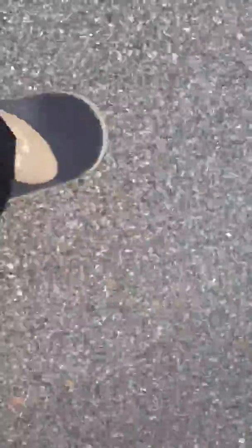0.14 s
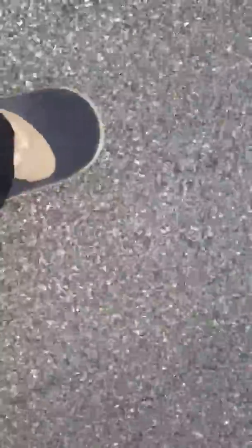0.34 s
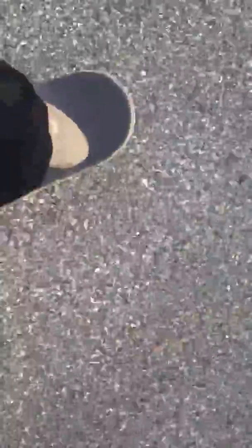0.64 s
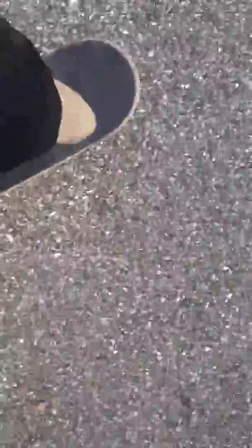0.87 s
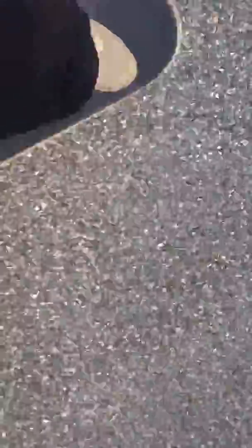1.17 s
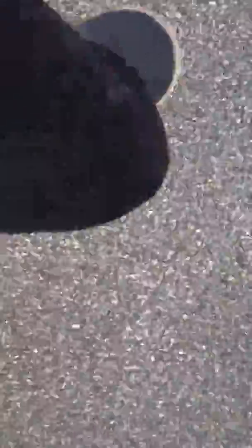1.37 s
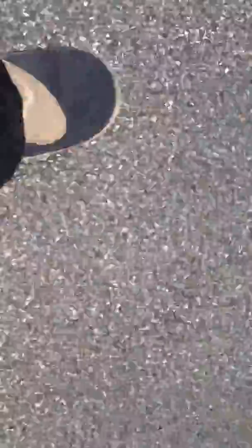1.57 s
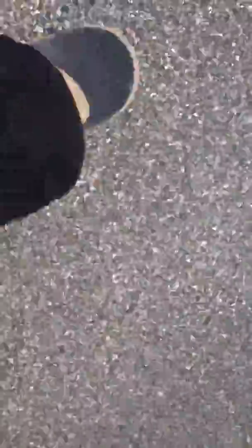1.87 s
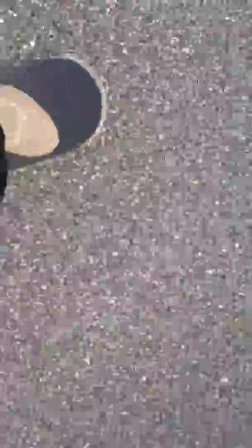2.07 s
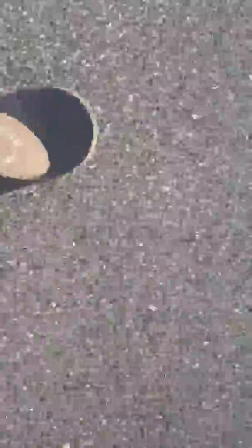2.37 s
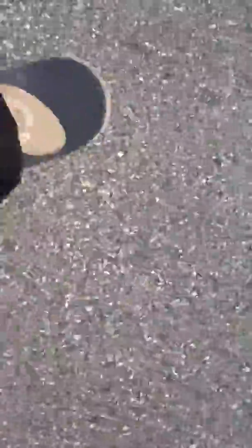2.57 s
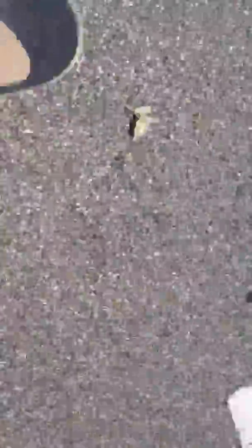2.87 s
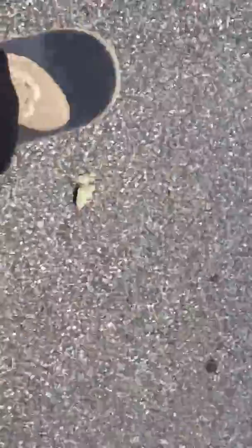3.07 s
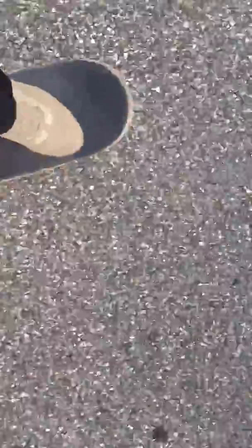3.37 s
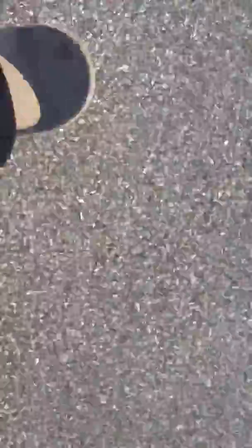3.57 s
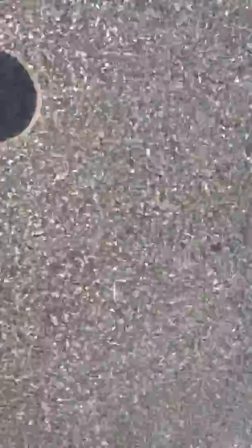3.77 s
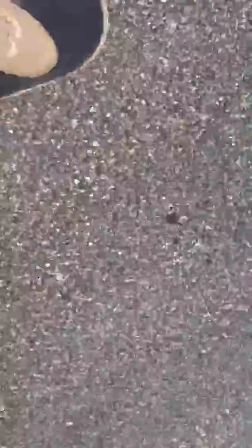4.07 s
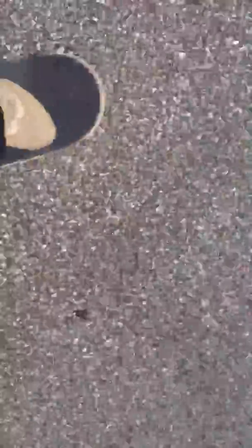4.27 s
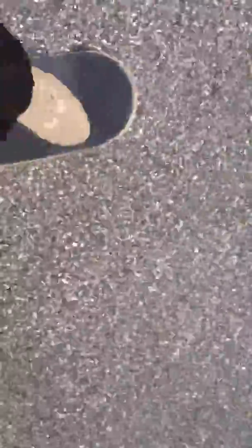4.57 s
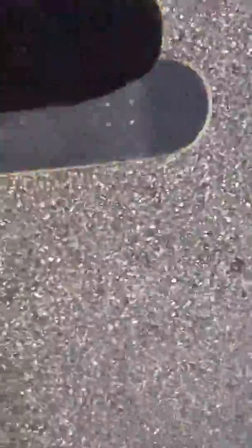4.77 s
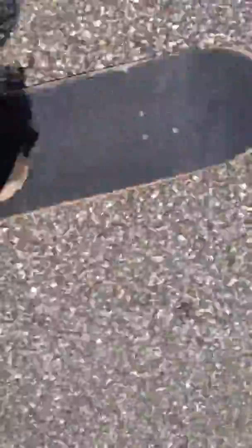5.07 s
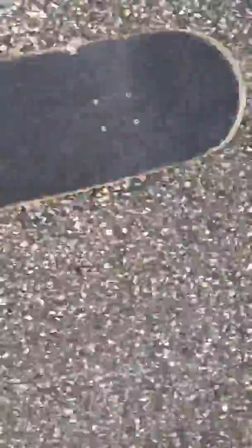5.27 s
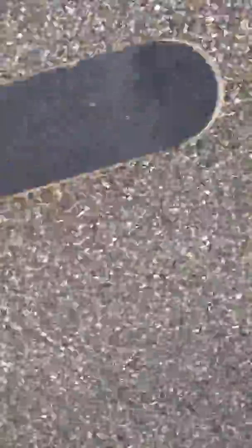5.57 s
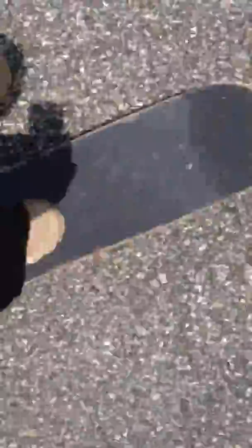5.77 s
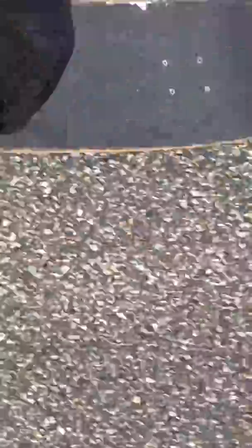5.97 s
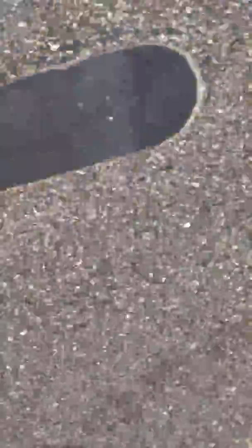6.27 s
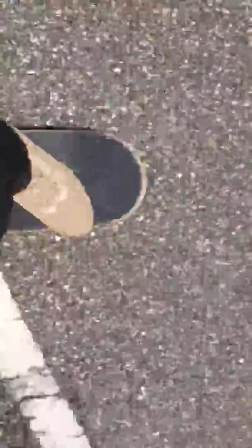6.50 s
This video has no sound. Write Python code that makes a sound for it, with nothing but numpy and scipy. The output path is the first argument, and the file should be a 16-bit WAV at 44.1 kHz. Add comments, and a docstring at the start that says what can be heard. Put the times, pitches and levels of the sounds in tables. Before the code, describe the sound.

From 0 s a skateboard rolls steadily over coarse asphalt, close and mono: a low, woody, uneven rumble with dry crunch, faint sandy fizz and tiny pebble ticks. Around 1.3 s the nose lifts; the rumble thins to a rear-wheel rasp, and at 1.6 s the front wheels knock down hard with quick rebounds and a short scrub. A shorter lift lands at 2.0 s, with sharp grit snaps. Rolling sags near 2.7 s; another lift from 2.9 ends in a double clack at 3.2. A fourth, from 3.55, thuds at 3.8, followed by scrubs and a small knock at 4.0. It is quieter around 4.4, with brief scrubs to 4.7. From 5.0 jolts build, bursting loudly at 5.3, easing, then clattering hardest at 5.9-6.1. Strong gritty rumble continues with more jolts and a hoarse, juddering scrub from 6.5 to the end, 6.6 s. Open air is only a faint wash.

```python
"""Coarse asphalt outdoors, heard from just above the deck of a rolling skateboard.
Random stone impacts drive deck resonances; four nose lifts add rear-wheel rasp and front-wheel knocks.
Filtered sparse grains make sand, grit and pebbles; decaying modes and short shocks make knocks and jolts.
Sideways wheel scrubs come throughout; late on, loud jolts over rougher ground. Behind, a faint noise wash of air."""
import sys
import numpy as np
from scipy import signal
from scipy.io import wavfile
from scipy.ndimage import uniform_filter1d, minimum_filter1d, map_coordinates

SR = 44100
rng = np.random.default_rng(int(sys.argv[2]) if len(sys.argv) > 2 else 0)


def to_wav(sig):
    """Store sig (one row per channel, or 1-D mono) as 16-bit WAV at the path in sys.argv[1].

    Samples outside -1..1 are clipped; the rate is SR.
    """
    pcm = np.clip(np.atleast_2d(sig), -1, 1) * 32767
    pcm = np.round(pcm).astype(np.int16)
    wavfile.write(sys.argv[1], SR, pcm.T)  # frames by channels


N = 292813
TIME = np.arange(N) / SR
HZ = np.fft.rfftfreq(4096, 1 / SR) + 1  # offset keeps log(0) away
EDGE_HZ = 15450

# Fine sand under the wheels: t/s, nominal level/dB, tilt to the finest fizz/dB
SAND_FIZZ = [(0, -58.5, 3), (0.9, -63, 0.5), (1.08, -68.5, -0.5), (1.33, -55, -1), (1.9, -58, 1),
             (2.12, -51.5, 2), (2.6, -62, 4), (3.0, -53, 0), (3.2, -60, 0), (3.48, -52.5, -1),
             (4.05, -60.5, 0.5), (4.3, -59, 3), (4.95, -55, 0.5), (5.32, -39.5, 2), (5.6, -54, 0),
             (6.02, -32.5, 2), (6.2, -48, -1.5), (6.48, -43.5, 2), (6.64, -53.5, 2.5)]
# Hiss spectrum of fine sand: f/Hz, level/dB
SAND_HISS = [(2500, -12), (3800, 1.5), (4900, 3.5), (6300, 4.5), (8000, 6.5), (9800, 4.5), (11000, 2),
             (12300, 2), (14500, -3), (16000, 9)]
# Grit bursting under a wheel: t/s, nominal level/dB, length/s, brightest f/Hz
GRIT_BURSTS = [(0.635, -55, 0.014, 5700), (0.86, -61.5, 0.12, 11800), (1.332, -46.5, 0.02, 14500),
               (1.39, -40, 0.017, 15400), (1.447, -52, 0.0074, 6670), (1.701, -52, 0.041, 12800),
               (1.952, -36.5, 0.02, 13000), (1.9625, -27.5, 0.003, 12400), (1.968, -38, 0.034, 13800),
               (2.066, -47, 0.013, 10400), (2.272, -50, 0.015, 10200), (2.19, -67, 0.58, 10700),
               (2.914, -34.5, 0.021, 14500), (2.977, -43, 0.021, 7560), (2.998, -49, .014, 7500),
               (3.059, -52, 0.0066, 14000), (3.595, -50, 0.042, 12600), (3.908, -48.5, 0.0064, 5650),
               (4.118, -50, 0.018, 11800), (4.292, -50.5, 0.033, 12200), (4.406, -47, 0.009, 14200),
               (4.59, -52, 0.29, 13700), (4.716, -44.5, 0.023, 7150), (4.785, -45.5, 0.016, 8240),
               (4.809, -55, .02, 10000), (5.171, -38.5, 0.01, 13900), (5.716, -40, 0.034, 9900)]
# Small steel wheel parts rung by grit: f/Hz, width/Hz, nominal level/dB
STEEL_MODES = [(3500, 240, 4.5), (5140, 400, 4.5), (5860, 230, 6), (7320, 340, 7.5), (9120, 220, 4.5),
               (10350, 420, 4), (12120, 350, -0.5), (12400, 480, -12.5), (14500, 940, -0.5)]
# Pebbles ticking against a wheel: t/s, peak level/dB, ring f/Hz
PEBBLE_TICKS = [(0.1282, -30, 1520), (0.3465, -27, 1500), (0.6856, -25, 1400), (0.7688, -26.5, 1330),
                (0.9152, -23, 1340), (0.9257, -22, 1530), (0.9454, -22.5, 1710), (1.2368, -20.5, 1190),
                (1.293, -21, 1400), (1.8752, -27.5, 1410), (1.9133, -26.5, 1500), (1.991, -25.5, 1460),
                (2.647, -34.5, 1430), (2.2765, -27, 1680), (2.8749, -19.5, 1480), (3.3628, -24.5, 1380),
                (3.3946, -25.5, 1420), (3.508, -23, 1480), (4.511, -26.5, 1330), (4.5497, -24, 1772),
                (4.6853, -23.5, 1580), (4.8893, -27, 1300), (4.9317, -25, 1300), (5.2435, -16, 1300),
                (5.434, -18.5, 1400), (5.4757, -21.5, 1980), (5.811, -17, 1360), (5.895, -11, 1300),
                (5.933, -0.5, 1320), (6.0373, -7, 1900), (6.2109, -19, 1330), (6.222, -18, 2100),
                (6.276, -15, 2160), (6.3113, -16.5, 2340), (6.4997, -8, 1870)]
# Deep thumps of the hardest blows: t/s, level/dB, length/s
BLOW_THUMPS = [(1.608, -49, 0.014), (3.837, -65, 0.0055), (5.268, -57, 0.018), (6.004, -37, 0.014),
               (6.035, -40, 0.029), (6.444, -50, .04)]
# Wheels striking large stones: t/s, thud level/dB, crack level/dB
STONE_JOLTS = [(1.280, -36, -39.5), (1.873, -38, -42), (2.42, -40, -47), (4.892, -46.5, -46.5),
               (5.027, -36.5, -43), (5.062, -36, -38.5), (5.133, -30, -35), (5.275, -24, -45),
               (5.286, -13.5, -26), (5.319, -18, -32), (5.416, -26.5, -35), (5.671, -30.5, -41.5),
               (5.703, -35, -56), (5.876, -26, -38), (5.933, -15.5, -27), (5.954, -19.5, -43),
               (5.963, -25, -31), (6.013, -8, -47), (6.041, -13, -26), (6.062, -19.5, -31.5),
               (6.075, -13, -22), (6.156, -29, -34.5), (6.193, -23, -44), (6.227, -29, -33),
               (6.336, -27, -53), (6.462, -17, -32), (6.473, -22.5, -31)]
# Wheels scrubbing sideways: t/s, ring level/dB, length/s, judder re ring/dB, ring f/Hz, start pitch/ring pitch
WHEEL_SCRUBS = [(1.258, -43.5, 0.048, -15, 2650, 0.84), (1.664, -31.5, 0.061, -17, 1250, 1.23),
                (3.359, -47.5, 0.07, -1, 1440, 1.3), (3.902, -43.5, 0.13, -4, 1320, 1.04),
                (3.926, -55, 0.092, -18, 3920, .95), (4.0092, -33, 0.0041, -16, 4160, 0.95),
                (4.475, -38.5, 0.088, -27, 1400, .9), (4.664, -37, 0.075, -7.5, 1510, 1.05),
                (6.473, -22, 0.065, -7.5, 1940, 0.72), (6.553, -28, 0.2, -0.5, 1760, 0.93)]
# Wheels knocking down: t/s, thud level/dB, clack level/dB, first rebound gap/s, bass from rider's weight/dB
WHEEL_KNOCKS = [(1.5875, -16.5, -32, 0.004, -5), (2.0044, -31, -30, .0061, -7),
                (3.2, -33.5, -31, 0.0062, -23), (3.2358, -34, -35, 0.0019, -6.5),
                (3.802, -25, -35, .0062, -1.5), (4.010, -35.5, -42, 0.0014, 11.5)]
# Deck ringing freely at a landing: f/Hz, level/dB, t60/s
LANDING_MODES = [(159, -17, 0.099), (290, -1.5, 0.059), (520, 7, 0.036), (565, 7, 0.039), (681, -2.5, 0.06),
                 (1120, -2, 0.036), (1360, -11, 0.054), (1520, -8, .036), (1676, -16.5, 0.037),
                 (2040, -32, 0.036)]
# Nose lifts, board pivots on rear wheels: lift t/s, landing t/s, roll-on t/s, fade by landing/dB, rasp level/dB
NOSE_LIFTS = [(1.304, 1.582, 1.74, -9, -42), (1.886, 2.014, 2.035, -7.5, -42.5),
              (2.896, 3.221, 3.31, -7.5, -41.5), (3.563, 3.814, 4.3, -13.5, -41.5)]
# Rear truck: f/Hz, width/Hz, level/dB
TRUCK_MODES = [(1480, 760, 3), (2595, 700, -3.5)]
# Deck and trucks: f/Hz, width/Hz, level/dB
DECK_MODES = [(190.6, 38, -19), (275, 157, -5.5), (336, 27.6, -5.5), (510.2, 68.5, 1), (590, 58, 4.5),
              (689.3, 107, 9), (1099, 287, -3.5), (1213, 21, -1.5), (1304, 82, -7), (1432, 405, -9.5),
              (1805, 245, -17.5), (2050, 270, -24), (2325, 34, -21.5), (2564, 1000, -28.5),
              (3320, 1150, -37.5), (4860, 810, -30)]
# Road drumming on the wheels, from speed and coarseness: t/s, base drive level/dB
ROAD_DRIVE = [(0, -39.5), (0.75, -38), (1.12, -42), (1.7, -34.5), (2.1, -39), (2.42, -37.5), (2.68, -50.5),
              (2.95, -38), (3.5, -40.5), (3.99, -41.5), (4.25, -44.5), (4.5, -46), (4.86, -40),
              (5.33, -19.5), (5.57, -32), (5.7, -31), (5.98, -17), (6.35, -24.5), (6.64, -23.5)]
# Sharpness of the stones: t/s, base crunch re drive/dB
STONE_CRUNCH = [(0, -15), (0.55, -16), (0.7, -10), (0.95, -11.5), (1.12, -12), (2.2, -12.5), (2.75, -11.5),
                (4.1, -14), (4.7, -7.5), (4.9, -8.5), (5.3, -9.5), (5.55, -14.5), (5.72, -8.5),
                (5.85, -9.5), (6.05, -9), (6.18, -16), (6.48, -12.5), (6.56, -13)]
# Weight on the wheels: t/s, base bass re drive/dB
WHEEL_WEIGHT = [(0, -1), (1.1, -1.5), (1.78, -1.5), (2.0, -2.5), (2.6, -3.5), (3.5, -2), (3.95, -10),
                (4.12, 0), (4.62, -0.5), (5.0, -10), (6.0, -8), (6.35, -9.5), (6.6, -5.5)]
# Rider leans on the board or eases off: t/s, extra drive/dB, half length/s
RIDER_PRESSES = [(1.244, 9, 0.078), (1.778, 1.5, 0.047), (2.79, 13, 0.11), (3.526, 4, 0.13),
                 (3.995, 11.5, 0.21), (4.359, -18, 0.041), (4.568, 7, 0.059), (4.777, 11, 0.02),
                 (4.833, -7, 0.14), (5.651, -11, 0.013), (6.47, 7, 0.038)]

PRESS_BASS_DB_PER_DB, PRESS_CRUNCH_DB_PER_DB = 0.14, -0.32  # only when leaning on
RATTLE_DB_PER_DB, CRUISE_DB = 0.0189, -46  # middle modes' gain over the body, per dB of drive over cruise
PATCH_DB, RATTLE_PATCH_DB = 0.86, 2  # asphalt patches vary drive and middle-mode rattle
SHIFT_S, UNLOAD_DB, SETTLE_DB = 0.0035, -3.5, -8.5  # weight shift; first drive drop; drive until roll-on
CRUNCH_KEPT = 0.71  # share of the lift fade that crunch escapes
STALL_S, STALL_DB = 0.056, -13.5  # rear wheels almost stop before landing; dB is for the deepest lift
RASP_LEAD_S, RASP_RISE_S, RASP_FADE_DB = 0.052, 0.01, -6.5  # catches before the lift, weakens as the turn slows
REBOUND_KEPT, REBOUND_SOONER = .55, .68  # force and gap ratio, each rebound to the one before
RATTLE_DB = -1.5  # loose truck rattle re clack
JOLT_CHATTER_S, PEBBLE_S = 0.0051, 0.0091  # wheel chatter after a stone; pebble slipping out
CRUMBLE_DB, FLUTTER_DB = -2.5, -2  # grit: toneless share, unevenness
ECHO_S, ECHO_SWAY_S, ECHO_DB = 0.002348, 0.00038, -11.5  # asphalt reflection: delay, rms sway, level


def amp(db):
    """Decibels to gain."""
    return 10 ** (np.asarray(db) / 20)


def unit(x):
    """Scales to rms 1."""
    return x / np.sqrt(np.mean(x ** 2) + 1e-20)


def steady(x, size=3500):
    """Rms near 1 over every short stretch, keeping the fast grain."""
    power = uniform_filter1d(uniform_filter1d(x ** 2, size), size // 2)
    return x / np.sqrt(abs(power) + 1e-20)


def curve(rows):
    """Every value column of a table, joined by straight lines in time."""
    s, *columns = np.transpose(rows)
    return [np.interp(TIME, s, c) for c in columns]


def shape(points):
    """Gain of a (Hz, dB) spectrum, interpolated over log frequency."""
    hz, db = np.transpose(points)
    return amp(np.interp(np.log(HZ), np.log(hz), db))


def modes(rows):
    """Gain of steep-sided resonances, summed in power."""
    return np.sqrt(sum((amp(db) / (1 + (2 * (HZ - hz) / width) ** 2)) ** 2 for hz, width, db in rows))


def below(hz, order):
    """Gain of a low-pass."""
    return 1 / np.sqrt(1 + (HZ / hz) ** (2 * order))


def above(hz, order):
    """Gain of a high-pass."""
    return 1 / np.sqrt(1 + (hz / HZ) ** (2 * order))


def ring(x, gain):
    """Causal minimum-phase filter, peak gain 1: rings only after each blow."""
    log_gain = np.log(np.maximum(gain / gain.max(), 1e-5))
    circle = np.concatenate([log_gain, log_gain[-2:0:-1]])
    taps = np.fft.ifft(np.exp(np.conj(signal.hilbert(circle)))).real[:len(HZ)]
    return signal.oaconvolve(x, taps)[:len(x)]


def add(mix, s, sound):
    """Mixes a sound in at time s."""
    part = mix[max(round(s * SR), 0):][:len(sound)]
    part += sound[:len(part)]


def stones(per_s, spread_db, size=N):
    """Random contacts of either sign; a positive spread makes a few large, a negative one a few small."""
    force = amp(spread_db * np.minimum(rng.exponential(1, size), 4))
    return unit(force * rng.choice([-1, 1], size) * (rng.random(size) < per_s / SR))


def clumps(spread_db, size, count=N):
    """Uneven gain: grains come in clusters about size samples long."""
    return amp(spread_db * np.tanh(unit(uniform_filter1d(rng.standard_normal(count), size))))


def drift():
    """Slow chance, rms 1, 2 to 16 Hz: the ground changes under the wheels."""
    coarse = TIME[::100]
    waves = sum(np.sin(2 * np.pi * (hz * coarse + rng.random())) for hz in np.geomspace(2, 16, num=12))
    return unit(np.interp(TIME, coarse, waves))


def strike(length_s, chatter, size):
    """Force of a blow: a first contact plus brief random chatter."""
    t = np.arange(size) / SR
    hits = rng.random(size) < 4000 / SR
    contacts = rng.standard_normal(size) * hits * np.exp(-(t / length_s) ** 4)
    return (t == 0) + chatter * contacts / (np.linalg.norm(contacts) + 1e-9)


def lifts():
    """Weight leaves the front wheels, the rear ones stall, the nose lands: fade and stall in dB."""
    fade = stall = np.zeros(N)
    deepest_db = min(row[3] for row in NOSE_LIFTS)
    for up, down, rolls, fade_db, _ in NOSE_LIFTS:
        landed = down + SHIFT_S
        fade_s = [up, up + SHIFT_S, down, landed, max(rolls - SHIFT_S / 2, landed), rolls + SHIFT_S]
        fade = fade + np.interp(TIME, fade_s, [0, UNLOAD_DB, fade_db, SETTLE_DB, SETTLE_DB, 0])
        stall_db = STALL_DB * (fade_db / deepest_db) ** 2  # deeper fade, fuller stop
        stall_s = [down - 2 * STALL_S, down - STALL_S / 2, down, landed]
        stall = stall + np.interp(TIME, stall_s, [0, stall_db, stall_db, 0])
    return fade, stall


def ride():
    """The rider's moves set the drive, and the bass and crunch over it, all in dB."""
    road_db = curve(ROAD_DRIVE)[0]
    fade, stall = lifts()
    press = sum(db * np.exp(-((TIME - s) / length) ** 2) for s, db, length in RIDER_PRESSES)
    lean = np.maximum(press, 0)
    drive_db = road_db + press + fade + stall + PATCH_DB * drift()
    weight_db = curve(WHEEL_WEIGHT)[0] + PRESS_BASS_DB_PER_DB * lean
    crunch_db = curve(STONE_CRUNCH)[0] + PRESS_CRUNCH_DB_PER_DB * lean - CRUNCH_KEPT * fade
    return drive_db, weight_db, crunch_db


def outdoors():
    """Faint, distant wash of open air: band-passed noise."""
    return amp(-64.5) * unit(ring(rng.standard_normal(N), above(89, order=3) * below(1270, order=3)))


def sand(roll, size=130):
    """Fine sand fizzes, most strongly as sharp stones bite into the wheels; its colour drifts."""
    bite = ring(roll, above(1300, order=3))
    press = steady(np.sqrt(abs(uniform_filter1d(bite ** 2, size))))
    level_db, tilt_db = curve(SAND_FIZZ)
    tilt = amp(tilt_db + drift())
    hiss = shape(SAND_HISS)
    coarse_grains = stones(per_s=8600, spread_db=2.5) * (0.19 + press)
    coarse = ring(coarse_grains, hiss * below(6300, order=5))
    fine_grains = stones(per_s=6400, spread_db=3.0) * (0.46 + press) * clumps(1.7, size=400)
    fine = ring(fine_grains, hiss * above(10160, order=5))
    stall_db = lifts()[1]
    fizz = amp(-6.5) * steady(coarse) / tilt + amp(3.0) * steady(fine) * tilt
    return amp(level_db + stall_db) * fizz


def grit(size=11000):
    """A crushed grain snaps, then crumbles in fluttering clicks that ring the steel, each time differently."""
    out, t = np.zeros(N), np.arange(size) / SR
    for s, db, length, hz in GRIT_BURSTS:
        struck = [(f, width, mode_db + rng.uniform(-6, 6)) for f, width, mode_db in STEEL_MODES]
        steel = modes(struck) + amp(CRUMBLE_DB) * above(3500, order=4)
        flutter = clumps(FLUTTER_DB, size=130, count=size)
        clicks = stones(per_s=3100, spread_db=-3.5, size=size) * flutter
        crumbs = unit(ring(clicks, steel * (1 + modes([(hz, 3000, 9)]))))
        fade = np.exp(-t / length / 2 - (t / length) ** 4)
        snap = 1 + 0.67 * np.exp(-t / 0.0078)
        add(out, s, amp(db) * crumbs * fade * snap)
    return out


def pebbles(size=1500):
    """A loose pebble ticks against a wheel and rings the deck's upper modes around its own pitch."""
    out, deck = np.zeros(N), modes(DECK_MODES)
    for s, db, hz in PEBBLE_TICKS:
        force = strike(PEBBLE_S, chatter=1.0, size=size)
        tick = ring(force, deck * above(0.84 * hz, order=3) * below(3840, order=6))
        add(out, s, amp(db) * tick / abs(tick).max())
    return out


def thumps(size=6000):
    """The hardest blows shake the microphone: short, deep, low-passed noise."""
    out, t = np.zeros(N), np.arange(size) / SR
    for s, db, length in BLOW_THUMPS:
        add(out, s, amp(db) * np.exp(-(t / length) ** 2))
    return out * steady(ring(rng.standard_normal(N), below(130, order=2)))


def jolts(size=3000):
    """A large stone thuds through the deck and cracks its upper modes; harder thuds crush more sand."""
    out, deck = np.zeros(N), modes(DECK_MODES)
    low = deck * above(264, order=3) * below(1320, order=2)
    high = deck * above(1450, order=4) * below(3500, order=3)
    for s, thud_db, crack_db in STONE_JOLTS:
        force = strike(JOLT_CHATTER_S, chatter=1.0, size=size)
        crushed = amp(-42.5 + thud_db / 2) * shape(SAND_HISS)
        thud = unit(ring(force, low))
        crack = unit(ring(force, high + crushed))
        add(out, s, amp(thud_db) * thud + amp(crack_db) * crack)
    return out


def scrub(size=12000):
    """Urethane sticks and slips as the board turns: a hoarse, gliding double ring and a low judder."""
    out, t = np.zeros(N), np.arange(size) / SR
    for s, db, length, judder_db, hz, start in WHEEL_SCRUBS:
        slips = stones(per_s=2100, spread_db=4.5, size=size)
        double_ring = modes([(hz * 0.65, hz * 0.39, -5), (hz, hz * 0.2, 0)])
        squeal = unit(ring(slips, double_ring * below(1.37 * hz, order=10)))
        pitch = 1 + (start - 1) * np.exp(-2 * t / length)
        squeal = map_coordinates(squeal, [np.cumsum(pitch)])  # variable-rate read glides the pitch
        judder = unit(ring(slips, above(142, order=4) * below(263, order=3)))
        envelope = np.minimum(t / .001, 1) * np.exp(-(t / length) ** 4)
        add(out, s, amp(db) * (squeal + amp(judder_db) * judder) * envelope)
    return out


def knocks(size=3000):
    """A landing and its quick rebounds ring the deck's wooden modes; the truck rattles with it."""
    out, t, deck = np.zeros(N), np.arange(size) / SR, modes(DECK_MODES)
    rings = [(hz, amp(db - 60 * t / t60) * np.sin(2 * np.pi * hz * t)) for hz, db, t60 in LANDING_MODES]
    bands_hz = [(0, 400), (400, 1230), (1000, SR)]
    bass, wood, upper = (sum(r for hz, r in rings if low < hz < high) for low, high in bands_hz)
    truck = (0.41 * modes(TRUCK_MODES) + 3 * deck) * below(3500, order=8)
    truck = (truck + amp(-34.5) * shape(SAND_HISS)) * above(1350, order=5)
    for s, thud_db, clack_db, gap, bass_db in WHEEL_KNOCKS:
        force, at = np.zeros(size), 0
        for bounce in range(4):
            add(force, at, np.array([REBOUND_KEPT ** bounce]))
            at += gap * REBOUND_SOONER ** bounce
        thud = np.convolve(force, wood + amp(bass_db) * bass)[:size]
        thud = unit(ring(thud, above(195, order=2)))
        clack = unit(ring(np.convolve(force, upper)[:size], above(1280, order=2)))
        rattle = unit(ring(strike(at + 0.0054, chatter=2.0, size=size), truck))
        add(out, s, amp(thud_db) * thud + amp(clack_db) * unit(clack + amp(RATTLE_DB) * rattle))
    return out


def rasp():
    """In each pivot the rear wheels slip over the stones in coarse jerks that ring the truck."""
    level = np.zeros(N)
    for up, down, _, _, rasp_db in NOSE_LIFTS:
        caught = up - RASP_LEAD_S
        gate = np.interp(TIME, [caught, caught + RASP_RISE_S, down - STALL_S, down], [0, 1, 1, 0])
        turned = np.clip((TIME - up) / (down - up), 0, 1)
        level += gate * amp(rasp_db + RASP_FADE_DB * turned)
    stall_db = lifts()[1]
    jerks = stones(per_s=770, spread_db=2.0) * clumps(5.0, size=300)
    truck = modes(TRUCK_MODES) * above(400, order=2) * below(3500, order=6)
    return level * amp(stall_db) * steady(ring(jerks, truck))


def rolling():
    """Stones drum on the wheels; weight brings out the deck's bass, sharp stones its upper modes."""
    drive_db, weight_db, crunch_db = ride()
    clusters = clumps(2.7, size=240)  # shared by every band
    deck = modes(DECK_MODES)
    road = unit(stones(per_s=560, spread_db=1.5) * np.sqrt(clusters))
    edges = unit(stones(per_s=800, spread_db=3.0) * clusters)  # small sharp stones: upper modes only

    def band(force, low_hz, high_hz):
        """The deck's answer between two frequencies."""
        return ring(force, deck * above(low_hz, order=8) * below(high_hz, order=8))

    # Lightly loaded, the higher modes of bass and body ring out
    free = amp(-.5 * (weight_db + 1.0) + 0.77 * drift())
    bass = steady(band(road, 148.4, 195.5) + free * band(road, 209, 391))
    body = steady(band(road, 449, 581) + free * band(road, 618, 946))

    sharp = amp(0.59 * (crunch_db + 5.0))  # crunching shifts the ring upwards
    rattle_high = sharp * amp(2 * drift()) * band(road + edges, 1290, 1833)
    rattle = steady(band(road + edges, 1000, 1245) + rattle_high)
    crunch_high = sharp * amp(2.2 * drift()) * band(0.81 * road + edges, 2030, 4030)
    crunch = steady(band(1.12 * road + edges, 1625, 2263) + crunch_high)

    rattle_db = 0.74 * crunch_db + 3.0  # middle modes follow crunch only in part
    rattle_db = rattle_db + RATTLE_DB_PER_DB * (drive_db - CRUISE_DB) + RATTLE_PATCH_DB * drift()
    lower = amp(1.4) * body + amp(weight_db) * bass
    higher = amp(rattle_db) * rattle + amp(crunch_db + 2.5) * crunch
    return amp(drive_db) * (lower + higher)


def ground_echo(x):
    """Asphalt reflects the roll; board sway varies the delay, so the resonances seem to slide."""
    sway = unit(uniform_filter1d(drift(), size=12000))
    echo = np.interp(TIME - ECHO_S - ECHO_SWAY_S * sway, TIME, x)
    return (x + amp(ECHO_DB) * echo) / np.hypot(1, amp(ECHO_DB))


def scene():
    """Air, ground and board, in one channel."""
    roll = ground_echo(rolling())
    ground = outdoors() + sand(roll) + grit() + pebbles()
    blows = thumps() + jolts() + scrub() + knocks()
    return (ground + blows + rasp() + roll)[None]


def record(dry, size=180):
    """A fast limiter holds the loudest jolts under the ceiling; then the band limit."""
    ceiling = .71
    allowed = np.minimum(ceiling / (abs(dry[0]) + 1e-9), 1)
    limited = dry * uniform_filter1d(minimum_filter1d(allowed, size), size)
    lowpass = signal.firwin(511, EDGE_HZ, window=("kaiser", 8), fs=SR)
    return signal.oaconvolve(limited, lowpass[None], "same")


dry = scene()
out = record(dry)
to_wav(out)
```